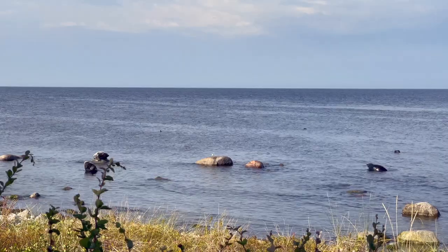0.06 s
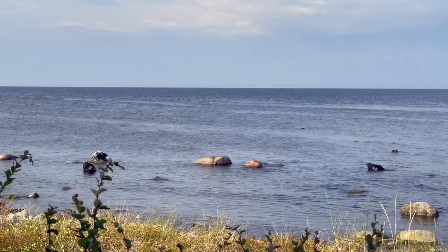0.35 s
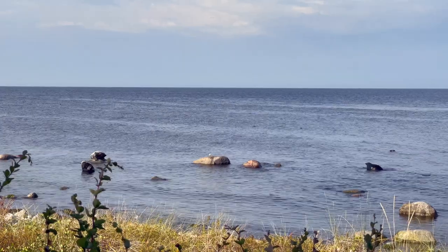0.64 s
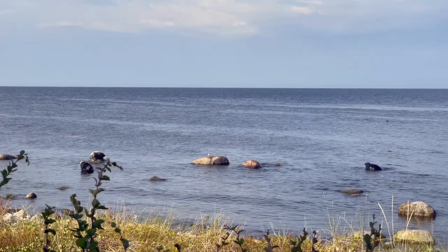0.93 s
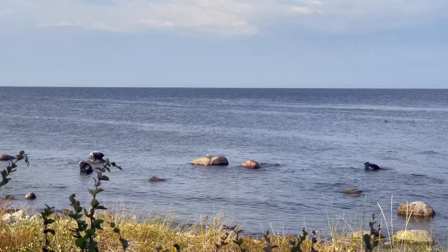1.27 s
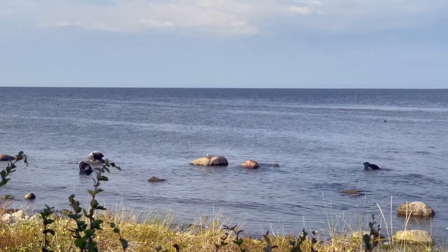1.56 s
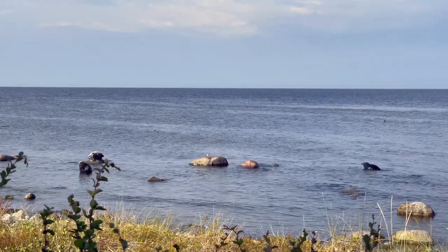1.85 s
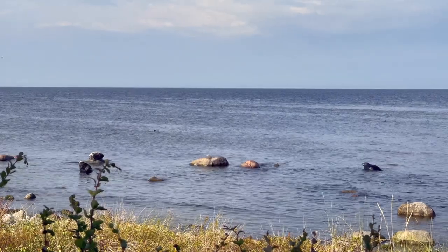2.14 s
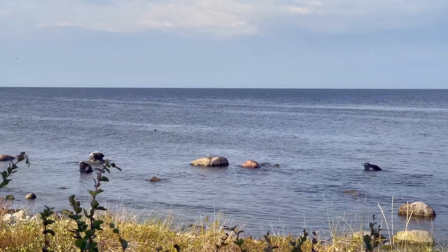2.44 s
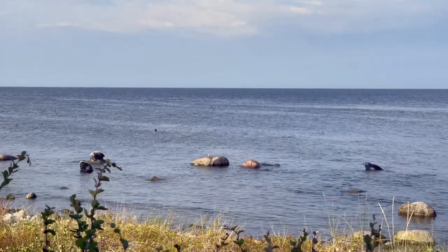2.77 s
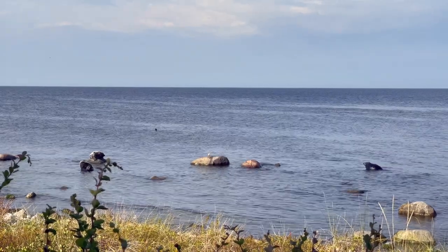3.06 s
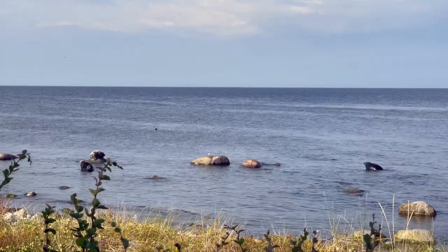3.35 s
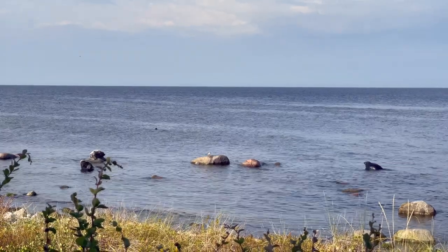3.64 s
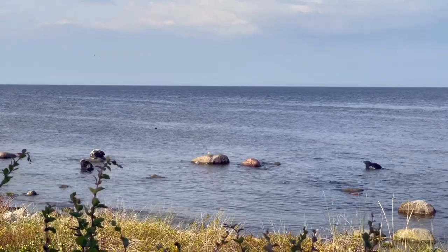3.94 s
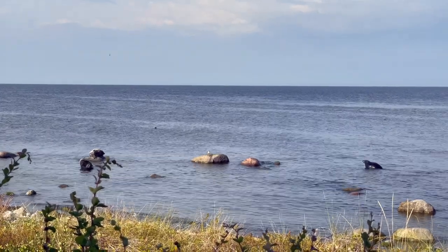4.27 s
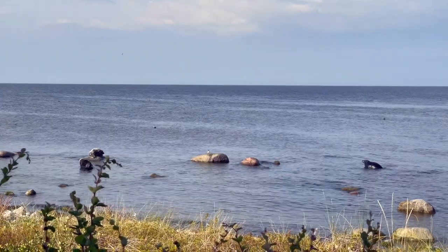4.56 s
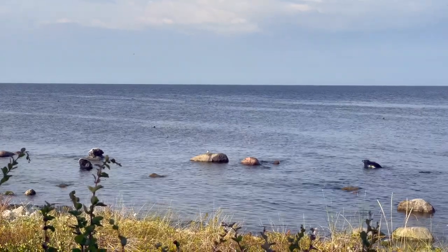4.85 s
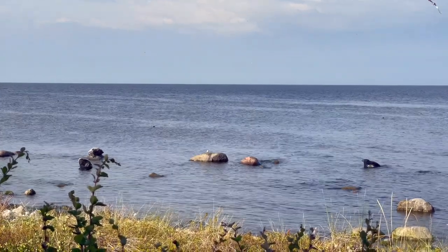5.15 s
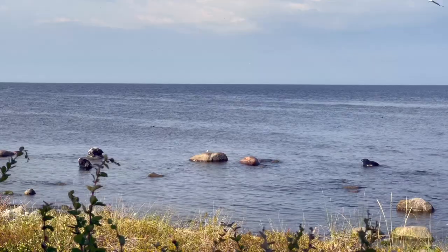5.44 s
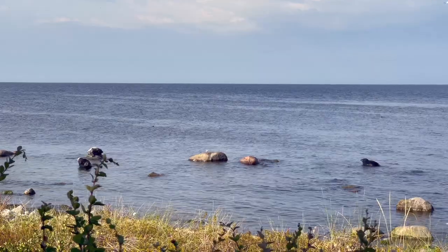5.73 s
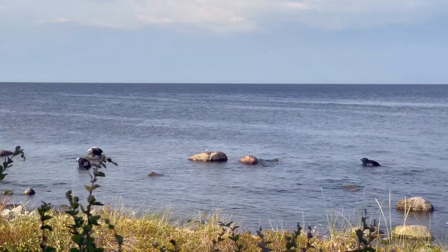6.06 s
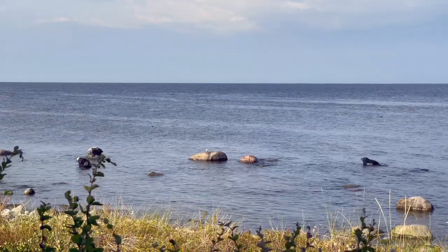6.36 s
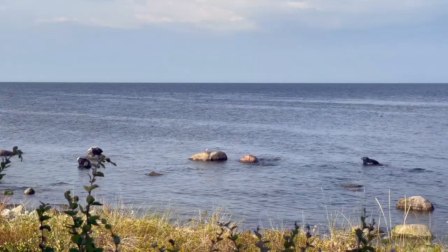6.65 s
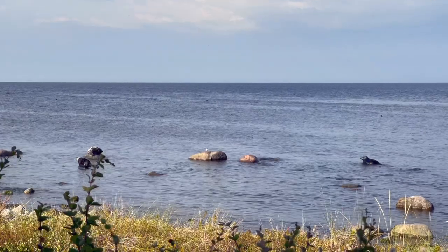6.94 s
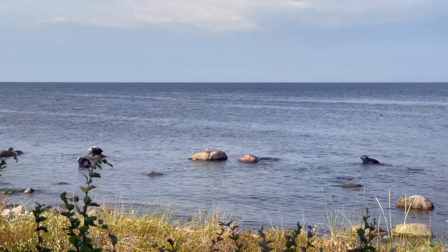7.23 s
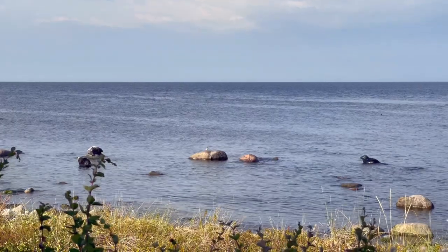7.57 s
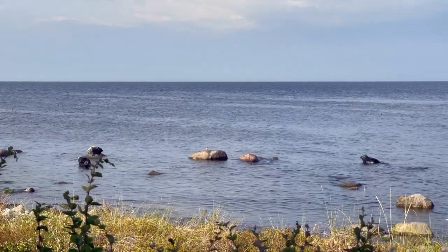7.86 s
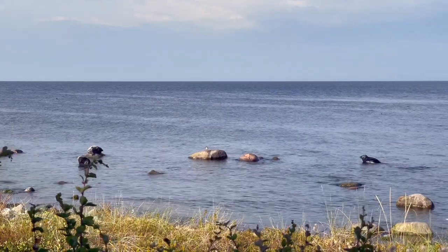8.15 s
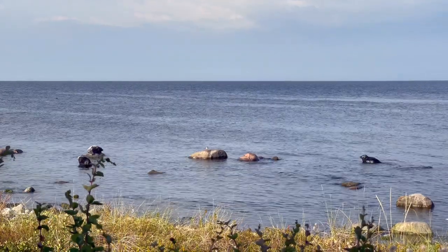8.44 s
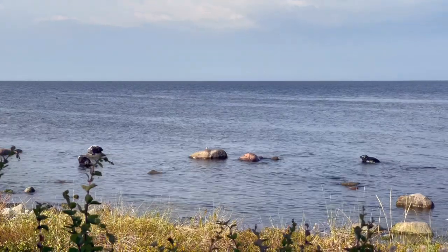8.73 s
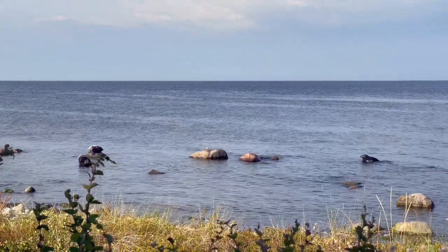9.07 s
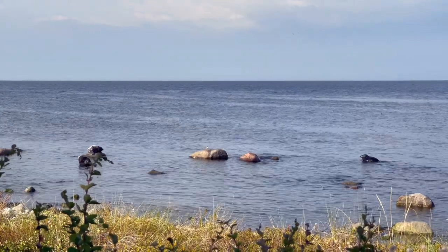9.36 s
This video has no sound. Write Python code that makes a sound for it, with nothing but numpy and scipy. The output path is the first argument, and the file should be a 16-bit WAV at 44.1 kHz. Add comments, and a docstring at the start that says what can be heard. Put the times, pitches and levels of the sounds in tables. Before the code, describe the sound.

A tern gives sharp, raspy chirps that quicken into a long series, over lapping wavelets and gusts on the microphone.

```python
"""Tern on a calm shore

Close to a stereo microphone by the sea, a bird, probably a tern, gives sharp 'kip' calls that quicken
into a long series, each a clear note ending in a rasp. Wavelets wash and lap on the stones over a faint
hum, and dry grass crackles nearby. Other terns call further off; late on, a far bird gives a falling
whistle, then begins a short second one. From four seconds on, gusts buffet the microphone."""
import sys
import numpy as np
from scipy import signal
from scipy.fft import rfft, irfft
from scipy.io import wavfile
from scipy.ndimage import uniform_filter1d

SR = 44100
rng = np.random.default_rng(int(sys.argv[2]) if len(sys.argv) > 2 else 0)


def inscribe(sig):
    """Save sig as 16-bit PCM at rate SR to the path in sys.argv[1].

    A 1-D sig is mono; a 2-D sig holds one channel per row.
    Samples are clipped to [-1, 1] before scaling.
    """
    pcm = np.round(np.clip(np.atleast_2d(sig).T, -1, 1) * 32767)
    wavfile.write(sys.argv[1], SR, pcm.astype(np.int16))


N = 414540
TIME = np.arange(N) / SR

# Levels in the tables are relative: the functions trim them in the mix.
# likeness of left and right in sea and wind noise: f/Hz, correlation/0-1
LIKENESS = [(60, 0.8), (140, 0.86), (300, 0.62), (700, 0.26), (1400, 0), (2200, 0.8), (3500, 0.95),
            (7000, 1), (12000, 0.95), (15000, 0.8)]
# wavelets reaching the stones: crest t/s, length/s, splash/dB, foam/dB
WAVELETS = [(0.31, 0.23, -57.5, -71), (0.864, 0.27, -59.5, -66), (1.3, 0.17, -59.5, -57),
            (1.753, 0.1, -59, -81), (2.33, 0.087, -77, -64), (2.62, 0.074, -62.5, -64),
            (3.117, .05, -55, -57.5), (3.277, 0.11, -60.5, -61.5), (3.377, 0.015, -51, -70),
            (3.775, 0.12, -56.5, -64), (4.85, .25, -62.5, -63.5), (5.393, 0.22, -66.5, -65),
            (5.68, 0.33, -59.5, -63), (6.398, 0.75, -70, -67), (6.922, 0.35, -60.5, -60),
            (7.287, 0.18, -59, -59), (7.61, 0.18, -63.5, -58.5), (8.132, 0.37, -59.5, -62),
            (8.657, 0.086, -61, -57.5), (8.997, 0.2, -57, -55), (9.298, 0.091, -54.5, -57)]
# the slow swell's low wash, and small waves tumbling over: t/s, level/dB
SWELL = [(0, -66), (.15, -62.5), (.55, -59), (.85, -68.5), (1.9, -67.5), (2.5, -63), (3.65, -61.5),
         (4.1, -64.5), (5.5, -60), (6.9, -63), (8.15, -63.5), (8.7, -59), (9.4, -58.5)]
BREAKERS = [(0, -63.5), (.1, -49.5), (.3, -49.5), (.5, -50), (.68, -59), (.8, -75), (1.2, -72), (8.9, -95),
            (9.15, -66), (9.4, -54.5)]
# spectra of the water's noises and of a steady faint hiss: f/Hz, level/dB
WASH_COLOUR = [(15, -30), (45, 1), (130, 3), (250, -1), (450, 0.5), (700, -0.5), (1100, -1.5), (1600, -9),
               (2500, -20), (5000, -44)]
TUMBLE_COLOUR = [(300, -34), (600, -10.5), (850, 3), (1250, -0.5), (1550, -3), (2000, -2), (2800, -24),
                 (5000, -49)]
SPLASH_COLOUR = [(600, -25), (1300, -4), (2000, 3), (3000, 0.5), (4500, -10.5), (6000, -20), (10000, -18)]
FOAM_COLOUR = [(2500, -3.5), (4500, 13), (5500, 7.5), (6500, 2), (8500, -1), (11500, -7.5), (12800, -45),
               (15500, -40)]
SLAP_COLOUR = [(60, -4), (180, -2), (500, -8), (900, -15), (2500, -48)]
HISS_COLOUR = [(2000, -4), (4500, 0), (6500, -1), (9000, 0), (12000, 3), (13500, -22), (15500, -22)]
# larger bubbles between the stones: t/s, f/Hz, level/dB, decay/s
PLOPS = [(0.356, 2730, -40, 0.0037), (.985, 1460, -49, 0.0089), (1.913, 2900, -45, 0.0053),
         (2.113, 350, -46.5, 0.019), (2.71, 2140, -50, 0.0075), (2.803, 1170, -51, .008),
         (3.41, 2160, -45, 0.012), (3.8, 1390, -44, .008), (6.629, 2690, -45, 0.0037),
         (9.15, 636, -45, 0.01), (9.235, 660, -39.5, 0.011)]
# dull slaps of water under the stones: t/s, level/dB, decay/s
SLAPS = [(6.702, -39.5, 0.0049), (7.292, -45.5, 0.0069), (7.52, -42, 0.008)]
# faint low hum: t/s, level/dB
DRONE = [(0, -67), (.1, -71.5), (.26, -55.5), (.8, -66), (1.2, -78), (1.7, -66.5), (1.98, -81.5),
         (2.7, -59), (3.3, -71.5), (3.65, -63), (4, -69)]
# the near tern's calls: t/s, note length/s, top f/Hz, level/dB, third harmonic over second/dB,
# rasp/dB, roughness/dB (the last two against the level)
KIPS = [(0.0455, 0.03, 1782, -46.5, -2, -6, -13), (1.469, 0.027, 1832, -38.5, 2, -11.5, -17),
        (1.6852, 0.032, 1805, -39, 6, -16, -21), (2.3235, 0.029, 1881, -30, 8.5, -14, -12),
        (2.552, .028, 1788, -33, 10.5, -8.5, -25), (3.0677, .028, 1882, -32, 7, -6.5, -12),
        (3.7265, 0.03, 1894, -35, 8.5, -3.5, -13), (3.9113, 0.03, 1920, -34, 10, -8, -24),
        (4.464, 0.026, 1855, -32.5, -0.5, -2.5, -16), (4.6551, .027, 1860, -30.5, 9.5, -3.5, -32),
        (4.8214, 0.03, 1964, -28, 2, -8.5, -15), (5.0092, .027, 1914, -29.5, 7.5, -4, -14),
        (5.2007, .032, 1873, -28.5, 2, -9.5, -22), (5.3891, .032, 1856, -31.5, 6.5, -3, -20),
        (5.5826, .029, 1832, -26, 5.5, -7.5, -15.5), (5.9268, 0.029, 1930, -28.5, 8, -5.5, -33),
        (6.126, .028, 1954, -27.5, 8.5, -5.5, -20), (6.3302, 0.034, 1816, -27.5, 3.5, -12, -16),
        (6.5052, 0.033, 1922, -27, 3.5, -7, -18), (6.7167, 0.033, 1876, -27.5, 8, -6.5, -24),
        (6.8935, 0.032, 1906, -27, 6, -6.5, -13), (7.059, 0.033, 1848, -27, 5.5, -6.5, -16),
        (7.2253, .033, 1855, -28, 7, -7, -17), (7.3739, .033, 1918, -27, 3.5, -7, -8),
        (7.539, 0.035, 1966, -27, 1.5, -6.5, -9), (7.7, .032, 1990, -26, 1.5, -6.5, -13),
        (7.8627, 0.032, 1938, -27, 2, -6, -16), (8.0263, 0.031, 1960, -29.5, 3, -3.5, -15),
        (8.2045, .032, 1809, -29, 2, -8.5, -24), (8.393, 0.034, 1830, -28.5, -1, -9, -21),
        (8.566, .032, 1849, -30, 7.5, -5.5, -21), (8.7273, .033, 1843, -31, 12, -2.5, -31),
        (8.896, 0.036, 1815, -32, -14, -9, -17), (9.0607, 0.034, 1870, -35, -19, -10.5, -24),
        (9.2296, 0.033, 1838, -35, -3.5, -4, -18)]
# the arch of every note: t/note lengths, pitch/top pitch, level/dB
KIP_ARCH = [(0, .945, -2), (.2, .965, -1.5), (.4, .993, .5), (.6, 1, 1), (.8, .988, .3), (.92, .96, -.3),
            (1.02, .915, -1.5), (1.15, .82, -8), (1.38, .73, -15), (1.7, .6, -36)]
# harmonics 5 to 8 against the fourth: level/dB
UPPER_HARMONICS_DB = [-14.5, -7.5, -11.5, -28]
# the voice's slow change of colour: t/s, fundamental/dB, fourth harmonic/dB, extra treble/dB
VOICE_COLOUR = [(0, 1, -3, -6), (1.5, -14, -11, -7), (3.9, -12.5, -13, -4), (4.8, -19, -13, -8),
                (6.7, -18.5, -10.5, -4.5), (7.95, -18.5, -14, 3.5), (8.25, -9, -17.5, 12),
                (8.7, -2, -19, 9), (9.25, -6, -16, -4)]
# throat resonances under the rasp: f/Hz, width/Hz, level/dB
THROAT = [(944, 150, -7.5), (2900, 634, 7), (4880, 237, 11), (5550, 390, -0.5), (6750, 760, -2.5),
          (10830, 790, -5)]
# dry stalks snapping: t/s, level/dB, decay/s
SNAPS = [(0.283, -50.5, 0.0033), (0.424, -46.5, .001), (0.478, -50, .003), (.761, -54, 0.0054),
         (.779, -41, .002), (.787, -39.5, 0.0038), (.796, -56, 0.019), (0.841, -45.5, .002),
         (3.356, -53, 0.0018), (3.385, -62, 0.0015)]
# spectrum of a snap: f/Hz, level/dB
SNAP_COLOUR = [(1000, -26), (3000, 5), (5500, -5), (8500, 7), (11500, 0), (14000, -35)]
# terns further off: t/s, top f/Hz, level/dB
FAR_KIPS = [(1.94, 1775, -69), (2.122, 1740, -66), (2.225, 1750, -71), (2.29, 1810, -62),
            (2.465, 1810, -64), (2.815, 1830, -68.5), (2.99, 1810, -67)]
# wind on the microphone: t/s, level/dB
WIND = [(0, -71), (2, -74), (3.95, -61), (4.4, -45), (4.9, -38.5), (5.25, -51.5), (5.65, -50.5),
        (5.95, -41), (6.65, -53), (7.25, -49.5), (7.48, -39.5), (7.78, -54), (8.12, -38.5), (8.6, -38),
        (8.8, -44), (9.4, -45.5)]
# spectrum of its rumble: f/Hz, level/dB
RUMBLE_COLOUR = [(8, -65), (20, -32), (32, -9), (48, 9.5), (70, 0), (100, -11.5), (160, -17), (250, -34),
                 (500, -61), (1500, -85)]
# single buffets: t/s, level/dB, width/s, f/Hz
BUFFETS = [(2.97, -43, 0.0095, 79.3), (4.211, -30, 0.008, 60.1), (4.397, -38, 0.0082, 59.6),
           (4.529, -34, 0.015, 64.3), (4.827, -24.5, 0.0094, 59), (5.473, -23, 0.0057, 71.5),
           (5.937, -33, .0095, 61.5), (6.292, -35, 0.013, 60.4), (8.089, -25.5, 0.017, 61.2),
           (8.141, -24.5, .0045, 151), (8.151, -20, 0.027, 54.4), (8.34, -29, .009, 78.2),
           (8.579, -28.5, 0.035, 70)]
# the far bird's falling whistle and the start of its second: t/s, f/Hz, level/dB
WHISTLES = [(8.86, 3290, -66), (8.92, 3260, -48), (9.05, 3067, -45.5), (9.1, 2910, -40.5),
            (9.135, 2533, -51), (9.17, 2320, -46.5), (9.24, 2195, -50), (9.32, 2480, -66), (9.4, 2170, -51)]
# microphone response: f/Hz, gain/dB
MIC_RESPONSE = [(100, 2), (12200, 0), (13200, -14), (14200, -14), (15700, -17)]
# constant phase shift of left against right in the treble, colouring the stereo image: f/Hz, lead/rad
STEREO_PHASE = [(0, 0), (1900, 0), (3200, .7), (5000, .55), (6400, .05), (7800, .35), (8700, 0),
                (10200, -3.1), (11900, -6.2), (12500, -6.4), (13500, -9.4), (16000, -12.5)]


def amp(db):
    """Decibels to gain."""
    return 10 ** (np.asarray(db) / 20)


def unit(x):
    """Scales to rms 1."""
    return x / np.sqrt(np.mean(x ** 2) + 1e-20)


def follow(rows, t):
    """Every column of a curve table, read at t along its first."""
    axis, *columns = np.transpose(rows)
    return [np.interp(t, axis, column) for column in columns]


def at_hz(points, hz):
    """Reads a spectrum on a log-frequency axis."""
    f, value = np.transpose(points)
    return np.interp(np.log(hz + 1), np.log(f + 1), value)


def add(mix, s, sound):
    """Mixes a sound in at time s."""
    part = mix[max(round(s * SR), 0):][:len(sound)]
    part += sound[:len(part)]


def coloured(colour, size, shift=1):
    """Noise of a given spectrum, its frequencies scaled by shift."""
    hz = np.fft.rfftfreq(size, 1 / SR)
    return unit(irfft(rfft(rng.standard_normal(size)) * amp(at_hz(colour, hz / shift)), size))


def wander(size, hz):
    """Random drift of rms 1, rolling off above hz."""
    f = np.fft.rfftfreq(size, 1 / SR)
    return unit(irfft(rfft(rng.standard_normal(size)) * (f > 0) / (1 + (f / hz) ** 4), size))


def stereo_noise(colour, patchy_db, flicker_db):
    """Partly alike noise in two channels, with drifting patches and a wide-band flicker."""
    frames, hz = N // 256 + 6, np.fft.rfftfreq(1024, 1 / SR)
    a, b, c, d, patches = rng.standard_normal((5, frames, len(hz)))
    patches = unit(uniform_filter1d(uniform_filter1d(patches, size=7, axis=0), size=12, axis=1))
    flicker = unit(uniform_filter1d(rng.standard_normal((frames, 1)), size=5, axis=0))
    likeness = at_hz(LIKENESS, hz)
    left = a + 1j * b
    right = likeness * left + np.sqrt(1 - likeness ** 2) * (c + 1j * d)
    spectra = np.array([left, right]) * amp(at_hz(colour, hz) + patchy_db * patches + flicker_db * flicker)
    return unit(signal.istft(spectra.transpose(0, 2, 1), nperseg=1024, noverlap=768)[1][:, :N])


def bursts(rows, colour):
    """Short dying bursts of noise, one for each row."""
    out, t = np.zeros(N), np.arange(SR // 10) / SR
    for s, db, decay in rows:
        add(out, s, amp(db) * coloured(colour, len(t)) * np.exp(-t / decay))
    return out


def wavelets(calm_splash_db=-64, calm_foam_db=-76, rise=0.93, foam_lag_s=0.022):
    """Strength of splash and foam: each wavelet builds to its crest and drains away more slowly."""
    splash, foam = amp(calm_splash_db) ** 2, amp(calm_foam_db) ** 2
    for crest_s, length, splash_db, foam_db in WAVELETS:
        age = (TIME - crest_s) / length
        building, draining = (age / rise) ** 2, np.hypot(age, .5) - .5
        power = np.exp(-1.2 * np.minimum(np.where(age < 0, building, draining), 20))
        splash += amp(splash_db) ** 2 * power
        foam += amp(foam_db) ** 2 * power
    return np.sqrt(splash), np.interp(TIME - foam_lag_s, TIME, np.sqrt(foam))


def bubble(hz, decay, rise=0.049):
    """A bubble rings and rises in pitch as it nears the surface."""
    age = np.arange(int(5 * decay * SR)) / SR / decay
    phase = 2 * np.pi * np.cumsum(hz * (1 + rise * age)) / SR
    return np.sin(phase) * np.exp(-age) * (1 - np.exp(-6 * age))


def lapping(per_s=190, spread_db=3.5, decay_cycles=3.9, pitches=30):
    """Many small bubbles of all sizes, spread left and right along the waterline."""
    out = np.zeros((2, N))
    count = int(per_s * N / SR / pitches)
    for hz in np.geomspace(700, 5500, pitches):
        starts = rng.integers(0, N, 200)[:count]
        clicks = np.zeros(N)
        clicks[starts] = amp(spread_db * np.minimum(rng.exponential(1, 200), 4))[:count]
        ring = signal.oaconvolve(clicks, bubble(hz, decay_cycles / hz, rise=0.029))[:N]
        out += amp(1.1 * rng.standard_normal((2, 1)) + at_hz(SPLASH_COLOUR, hz) / 2) * ring
    return unit(out)


def sea():
    """The water's edge: a low wash, tumbling crests, brighter splashes with bubbles, a fizz of foam."""
    splashing, foaming = wavelets()
    breaking, swell = amp(follow(BREAKERS, TIME)[0]), amp(follow(SWELL, TIME)[0] + 5)
    tumble = breaking * stereo_noise(TUMBLE_COLOUR, patchy_db=2.5, flicker_db=-2)
    wash = swell * stereo_noise(WASH_COLOUR, patchy_db=1.8, flicker_db=.9)
    wash *= amp([[.5], [-.5]])  # a little to the left
    splash = splashing * stereo_noise(SPLASH_COLOUR, patchy_db=2.5, flicker_db=2)
    foam = amp(-2) * foaming * stereo_noise(FOAM_COLOUR, patchy_db=4, flicker_db=1.8)
    hiss = amp(-75.5) * stereo_noise(HISS_COLOUR, patchy_db=-1, flicker_db=2.5)
    bubbles = amp(-5.5) * splashing * lapping()
    plops = np.zeros(N)
    for s, hz, db, decay in PLOPS:
        add(plops, s, amp(db) * bubble(hz, decay))
    return wash + tumble + splash + foam + hiss + bubbles + plops + bursts(SLAPS, SLAP_COLOUR)


def drone(hz=80, width_hz=7):
    """A faint wavering low hum, perhaps a boat far out."""
    phase = 2 * np.pi * hz * TIME
    waver = np.cos(phase) * (1 + .5 * wander(N, width_hz)) + 1.2 * np.sin(phase) * wander(N, width_hz)
    return amp(follow(DRONE, TIME)[0] + 4.5) * unit(waver)


def note(length, top_hz, harmonics_db, rough_db, treble_db=0, catch=0):
    """The clear part of a call: an arched stack of harmonics that breaks up as its pitch drops."""
    attack_s, catch_s, catch_width_s, shimmer_db = 0.00077, 0.0056, 0.0018, 2.26
    size = int(2 * length * SR)
    t = np.arange(size) / SR
    arch, level_db = follow(KIP_ARCH, t / length)
    breaking = np.clip((t / length - .95) * 4, 0, 1)
    sag = catch * np.exp(-((t - catch_s) / catch_width_s) ** 2)  # the voice catches just after it starts
    hz = top_hz * arch * (1 - .054 * sag + .0019 * wander(size, 210) + .033 * breaking * wander(size, 760))
    slip = (.22 * amp(rough_db) + .07 * breaking) * wander(size, 900)
    phase = 2 * np.pi * np.cumsum(hz) / SR + slip  # uneven cycles blur the high harmonics most
    upper_db = harmonics_db[3] + treble_db * np.array([0, 1, 1, 1]) + UPPER_HARMONICS_DB
    stack = sum(amp(db + shimmer_db * wander(size, 58)) * np.cos(k * phase + k ** 2)
                for k, db in enumerate([*harmonics_db, *upper_db], 1))
    # late in the note, strong and weak cycles alternate and put lines between the harmonics
    rough = amp(rough_db) * np.clip(t / length * 1.24, 0, 1) ** 2 + 0.19 * breaking
    alternation = 1.47 * rough * np.cos(phase / 2 + wander(size, 250))
    grain = (0.0085 + 0.27 * rough) * wander(size, 1700)
    ragged = amp(breaking * (4 * wander(size, 260) - 1.5))
    envelope = amp(level_db - 2 * sag) * np.minimum(t / attack_s, 1)
    return np.sqrt(2) * stack * (1 + alternation + grain) * ragged * envelope


def rasp(length, treble_db, sweep_hz=1150, end_hz=130, slowing_s=.012, jitter=.3, fall_db_per_s=800):
    """The end of a call: the syrinx slows into separate irregular pulses that ring the throat."""
    t = np.arange(2200) / SR
    rate = (end_hz + sweep_hz * np.exp(-t / slowing_s)) * np.exp(jitter * wander(len(t), 600))
    beats = np.diff(np.floor(np.cumsum(rate) / SR), prepend=0)
    pulses = beats * amp(2.3 * rng.standard_normal(len(t))) / np.sqrt(rate / sweep_hz)  # slower is larger
    drive = pulses + .05 * rng.standard_normal(len(t))
    ring = np.zeros(len(t))
    for k, (hz, width, db) in enumerate(THROAT):
        lift_db = treble_db / 2 * (k == len(THROAT) - 1)  # bright calls lift the highest resonance
        resonance = width * np.exp(-np.pi * width * t) * np.sin(2 * np.pi * hz * t)
        ring += (-1) ** k * amp(db + lift_db) * resonance
    fades = np.minimum(t / .009, 1) * np.minimum((t[-1] - t) / .012, 1)
    decay = amp(-fall_db_per_s * np.maximum(t - .012, 0))
    sound = signal.fftconvolve(drive, ring)[:len(t)] * fades * decay
    return sound / np.std(sound[:int(length * SR)])


def near_tern(usual_hz=1929, fundamental_db_per_hz=0.0416, hurried_s=0.17, rested_s=0.21):
    """Close by, each call is a clear note, carried by its second and third harmonics, then a rasp."""
    notes, rasps = np.zeros((2, N))
    previous_s = -np.inf
    for s, length, top_hz, db, third_db, rasp_db, rough_db in KIPS:
        first_db, fourth_db, treble_db = follow(VOICE_COLOUR, s)
        first_db += fundamental_db_per_hz * (top_hz - usual_hz)  # higher calls carry more fundamental
        second_db = -10 * np.log10(1 + amp(third_db) ** 2)  # second and third share the power
        harmonics_db = db + np.array([first_db, second_db, second_db + third_db, fourth_db])
        rested = np.clip((s - previous_s - hurried_s) / (rested_s - hurried_s), 0, 1)
        add(notes, s, note(length, top_hz, harmonics_db, rough_db, treble_db, catch=0.72 * rested))
        add(rasps, s + length, amp(db + rasp_db) * rasp(length, treble_db))
        previous_s = s
    return amp(-0.92) * notes + amp(-4.5) * rasps


def grass():
    """Dry stalks snap close to the microphone."""
    return bursts(SNAPS, SNAP_COLOUR)


def far_terns():
    """The tern's note from a distance, where little but its second harmonic carries."""
    out = np.zeros(N)
    for s, top_hz, db in FAR_KIPS:
        add(out, s, note(0.021, top_hz, db + np.array([-22, 1.5, -25, -25]), rough_db=-27))
    return out


def wind(eddy_db=2.5, eddy_hz=7.9):
    """Eddies rumble on the microphone; the strongest land as short buffets of a few pressure swings."""
    level = amp(follow(WIND, TIME)[0] + eddy_db * wander(N, eddy_hz))
    buffets = np.zeros(N)
    t = np.arange(-SR // 8, SR // 8) / SR
    for s, db, width, hz in BUFFETS:
        phase = 2 * np.pi * (np.cumsum(hz * np.exp(0.249 * wander(len(t), 97))) / SR + rng.random())
        swing = np.sin(phase) + 0.16 * coloured(RUMBLE_COLOUR, len(t), shift=hz / 50)
        add(buffets, s + t[0], amp(db) * swing * np.exp(-(t / width) ** 2 / 2))
    return level * stereo_noise(RUMBLE_COLOUR, patchy_db=3, flicker_db=-1.5) + buffets


def far_bird(throb_hz=38, throb_end_s=9.13, throb_fade_s=0.073):
    """Far off, a near-pure whistle throbs at first and slides down; then a short second one begins."""
    hz, db = follow(WHISTLES, TIME)
    throb = np.clip((throb_end_s - TIME) / throb_fade_s, 0, 1) * np.sin(2 * np.pi * throb_hz * TIME)
    phase = 2 * np.pi * np.cumsum(hz * (1 + 0.005 * wander(N, 80))) / SR
    return amp(db - 1.5) * (1 + throb) * np.sin(phase) * (TIME > WHISTLES[0][0])


def shore_scatter(sound, t60_s=0.32, bank_s=0.074, bank_width_s=.03, bank_gain=0.68):
    """Thin scatter from stones and bushes, with a soft late return from the bank."""
    t = np.arange(SR // 2) / SR
    taps = rng.standard_normal((3, len(t))) * (rng.random((3, len(t))) < .05)  # left, right and shared
    bank = 1 + bank_gain * np.exp(-((t - bank_s) / bank_width_s) ** 2)
    taps = (taps[:2] * 0.25 + taps[2]) * amp(-60 * t / t60_s) * bank
    return signal.fftconvolve(sound[None], taps / np.linalg.norm(taps[0]), axes=1)[:, :N]


def scene():
    """The birds over the open shore, with sea and wind; the further a bird, the more of it is scatter."""
    tern, whistles, flock = near_tern(), far_bird(), far_terns()
    scatter = shore_scatter(amp(-23.5) * tern + amp(-7) * whistles + amp(-8) * flock)
    return tern + whistles + amp(2.5) * flock + scatter + sea() + drone() + wind() + grass()


def record(dry, low_cut_hz=39, high_cut_hz=15700):
    """A wind filter cuts deep bass; the treble is phase-shifted left against right and its top dulled."""
    filtered = signal.sosfilt(signal.butter(6, low_cut_hz, "highpass", fs=SR, output="sos"), dry)
    hz = np.fft.rfftfreq(N, 1 / SR)
    lead = follow(STEREO_PHASE, hz)[0]
    response = amp(at_hz(MIC_RESPONSE, hz)) * np.exp(.5j * np.array([lead, -lead]))
    shifted = irfft(rfft(filtered) * response, N)
    high_cut = signal.firwin(511, high_cut_hz, window=("kaiser", 9), fs=SR)
    return signal.oaconvolve(shifted, high_cut[None], "same")


dry = scene()
out = record(dry)
inscribe(out)
```